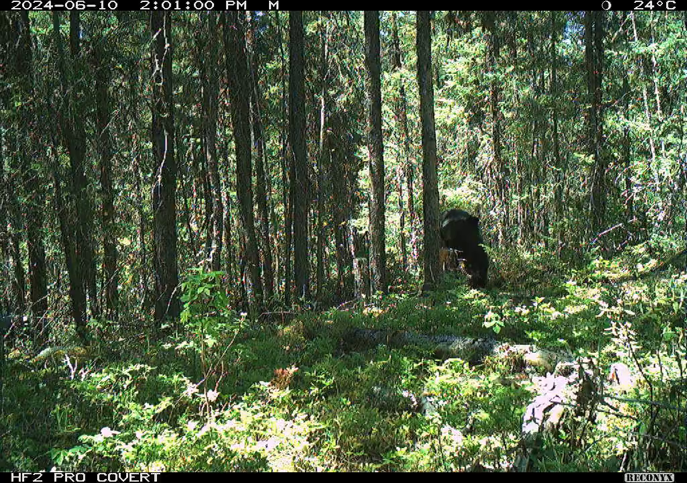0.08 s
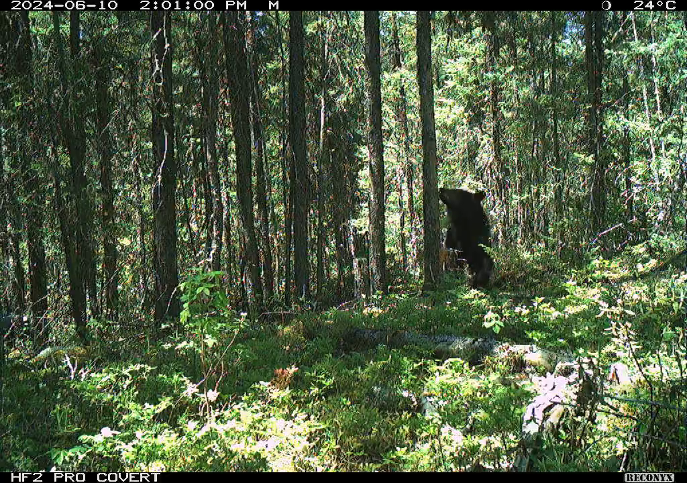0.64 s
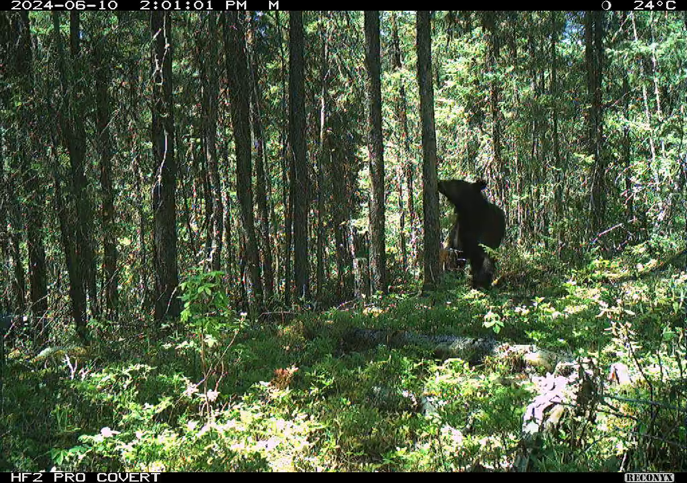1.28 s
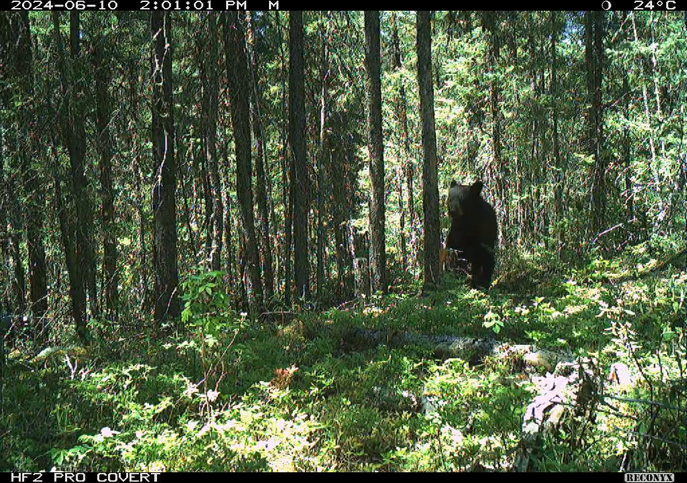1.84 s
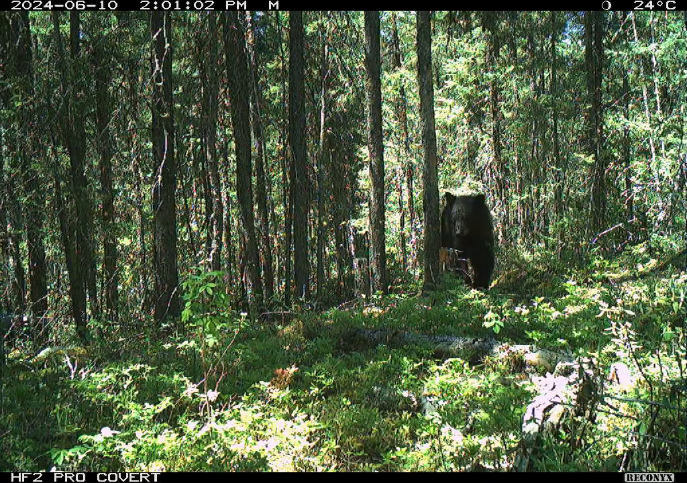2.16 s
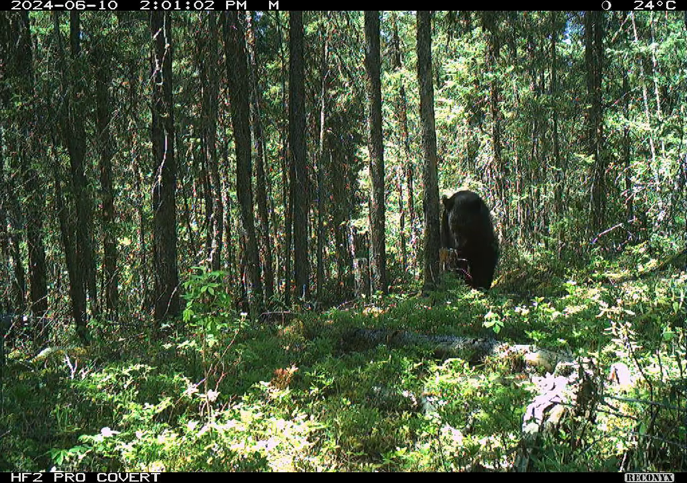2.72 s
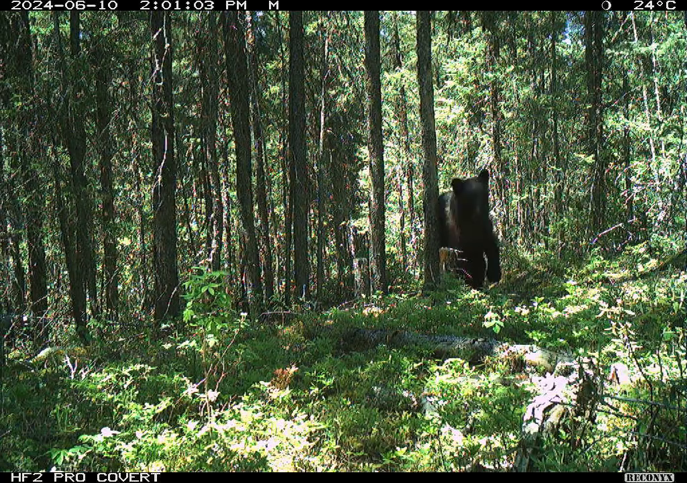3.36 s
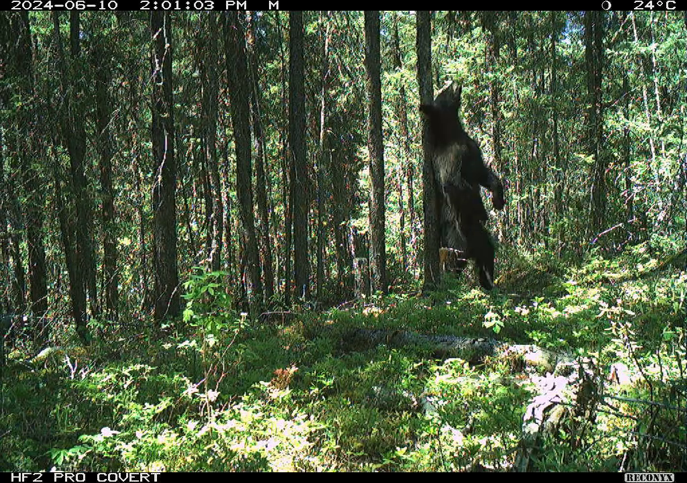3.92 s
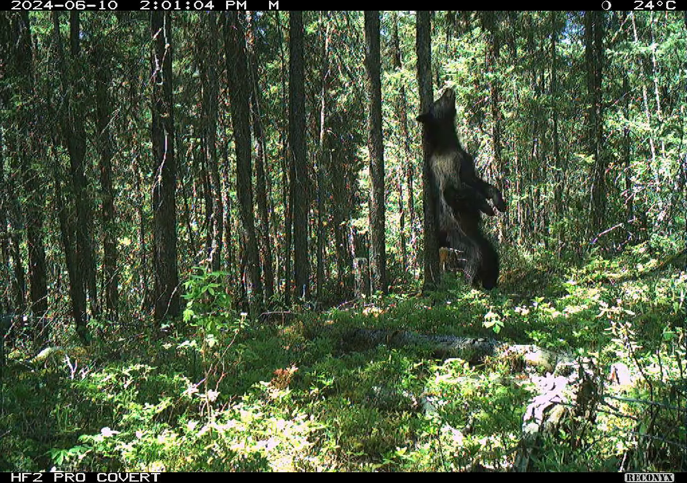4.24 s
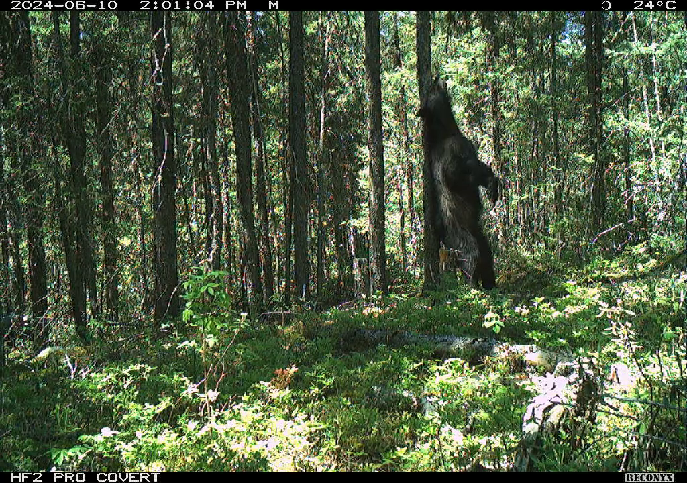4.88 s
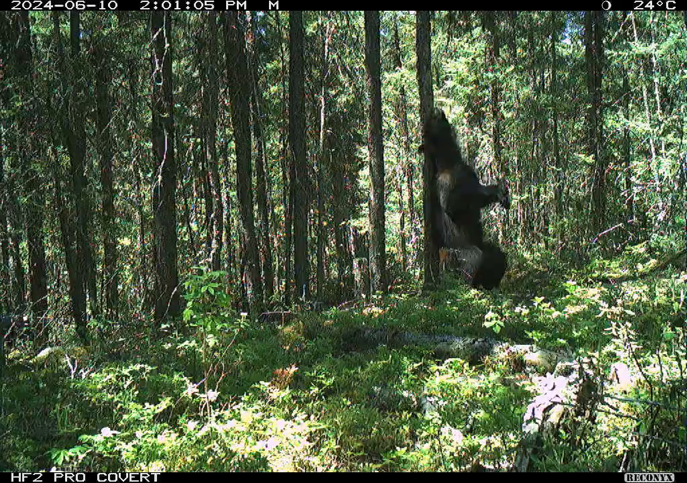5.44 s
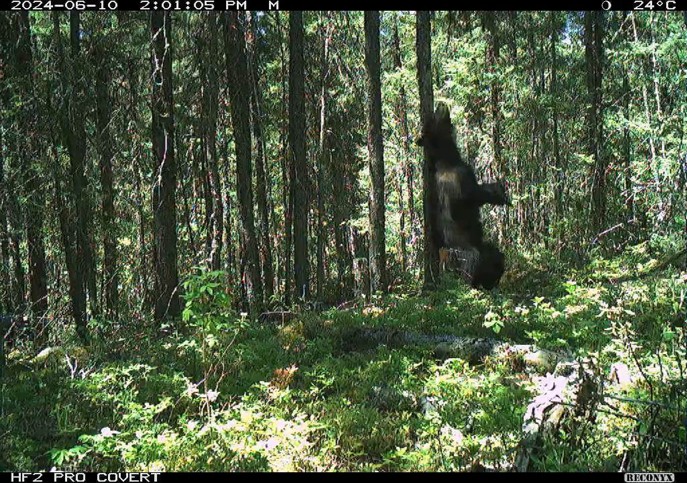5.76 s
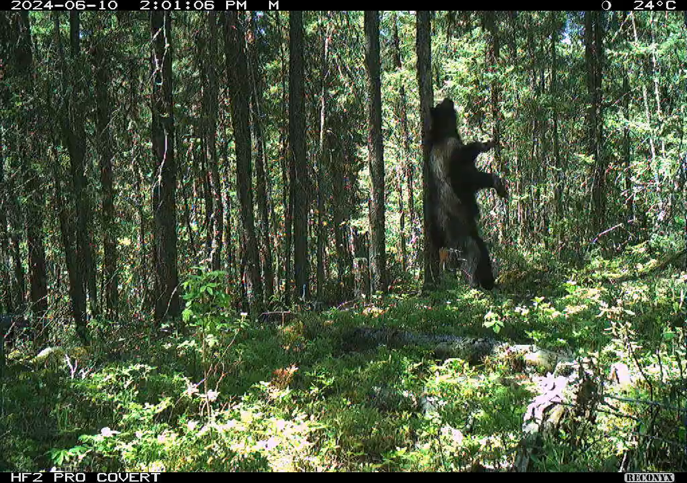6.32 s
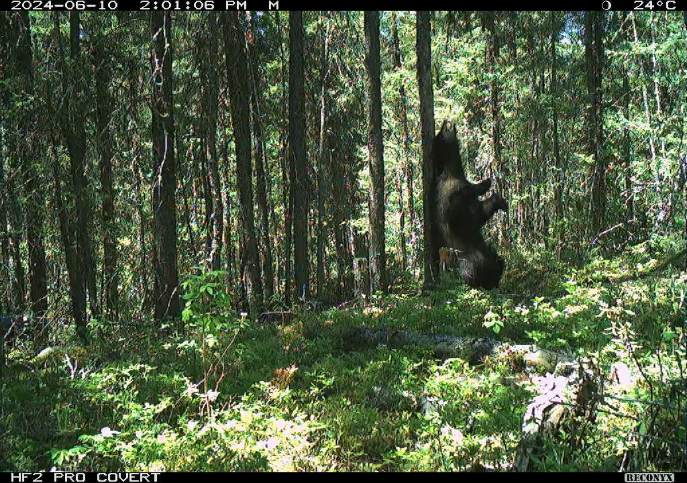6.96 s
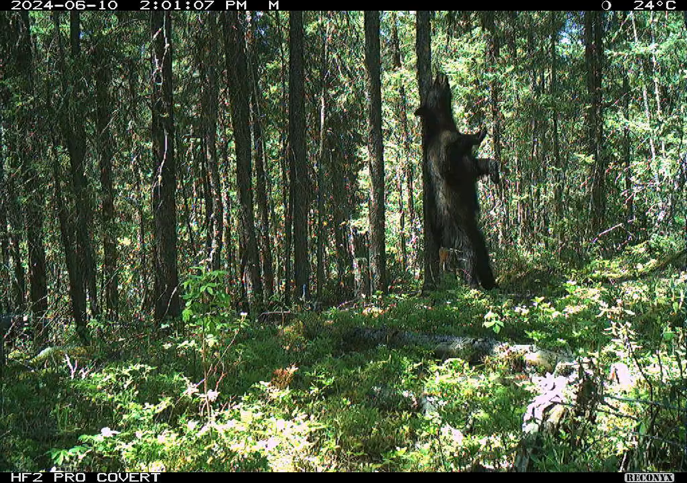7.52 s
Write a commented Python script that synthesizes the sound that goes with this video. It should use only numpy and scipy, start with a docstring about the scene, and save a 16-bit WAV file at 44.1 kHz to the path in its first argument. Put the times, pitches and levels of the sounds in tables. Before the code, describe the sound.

In a quiet forest, a soft pop opens onto constant microphone hiss and a few low bumps of wind. Small birds whistle, chirp and trill faintly in the first half. At a distance, a bear starts dragging its fur over tree bark, a dry, high rasp in repeated strokes. One dull footfall sounds midway, and crisp cracks of twigs and bark come more often toward the end.

```python
"""A trail camera in a forest wakes with a pop and fades up into its own hiss, wind rumbling at the port.
Small birds whistle and trill among the trunks. Some way from the microphone, a bear rears up
and rubs its back on a pine: fur drags over the bark in strokes, flakes and twigs snap,
and a hind paw thuds on the soil."""
import sys
import numpy as np
from scipy import signal
from scipy.fft import rfft, irfft
from scipy.io import wavfile

SR = 44100
rng = np.random.default_rng(int(sys.argv[2]) if len(sys.argv) > 2 else 0)


def put_to_file(sound):
    """Save the sound as 16-bit audio at rate SR, in the file named by the first command-line argument."""
    columns = np.atleast_2d(sound).T  # one column per channel
    safe = np.clip(columns, -1, 1)
    whole_steps = np.round(safe * 32767)
    wavfile.write(sys.argv[1], SR, whole_steps.astype(np.int16))


N = 340011
TIME = np.arange(N) / SR


# Strokes of the bear's back on the pine, some way off.
# Each row: start in seconds, length in seconds, relative level in dB, extra rasp in dB.
BACK_STROKES = [(2.717, 0.15, -74, 3), (2.88, 0.16, -72, 7), (3.24, 0.57, -69, 2), (3.691, 0.15, -59, -5),
                (3.758, 0.43, -69, 0.5), (4.07, 0.3, -64.5, -2.5), (4.402, 0.2, -61.5, 2),
                (4.674, 0.3, -62, -2), (5.06, 0.41, -58, -.5), (5.471, .14, -63, -2),
                (5.663, 0.32, -61.5, -4.5), (5.822, 0.27, -58, 1.5), (6.018, 0.33, -62, 1.5),
                (6.315, 0.37, -58, .5), (6.555, 0.33, -57, 0.5), (7.067, .2, -58.5, -1),
                (7.189, 0.22, -55, 1.5), (7.338, 0.15, -64, 0), (7.615, .09, -78, -3)]
# The colour of scraped bark. Each row: frequency in Hz, relative level in dB.
BARK_SPECTRUM = [(1060, -30), (1800, -19), (2150, -13.5), (2410, -17), (2730, -6.5), (2960, -15),
                 (3190, -10), (4070, -2.5), (4560, -0.5), (5070, -6), (5490, -12), (6440, -5), (7650, -7.5),
                 (8570, -20.5), (8800, -32), (11400, -62), (19400, -120)]

def rubbing(level_db=4, fur_db=-2, flakes_db=-5, flakes_per_s=600, catch_db=1, rasp_hz=5500):
    """Fur hisses over bark while flakes tick; the coat catches and slips, and leaning in adds rasp."""
    # once the bear is upright, its coat brushes the bark between strokes too
    hiss_power = rasp_power = (amp(-73) * ramp(start=3.15, length=0.25)) ** 2
    for start, length, db, rasp_db in BACK_STROKES:
        sliding_speed = arch(start, length)
        friction = amp(db) * sliding_speed ** 0.73
        hiss_power = hiss_power + friction ** 2
        rasp_power = rasp_power + (amp(rasp_db) * friction) ** 2
    flake_db = 3 * np.minimum(rng.exponential(1, N), 4.5)
    ticks = amp(flake_db) * rng.choice([-1, 1], N) * (rng.random(N) < flakes_per_s / SR)
    flakes = amp(flakes_db) * shaped(ticks, BARK_SPECTRUM)
    fur = amp(fur_db) * shaped(rng.standard_normal(N), BARK_SPECTRUM)
    scrape = fur + flakes
    rasp = signal.sosfiltfilt(signal.butter(6, rasp_hz, fs=SR, output="sos"), scrape)
    hiss = scrape - rasp  # the part above rasp_hz
    catching = amp(level_db + catch_db * drift(35))
    return catching * (np.sqrt(hiss_power) * hiss + np.sqrt(rasp_power) * rasp)


# Bark flakes and twigs breaking at the pine. Each row: start in seconds, rough peak in dB,
# ring frequency in Hz, ring strength in dB, crumbling time in seconds.
BREAKS = [(0.835, -53, 7000, 7, .0019), (1.578, -43, 6900, 0, .0026), (2.7745, -42, 5050, 12, 0.0025),
          (2.9065, -44, 4500, 8, 0.0023), (2.916, -32, 4200, 10, 0.001), (2.9185, -27.5, 4650, 16, 0.0019),
          (2.924, -39, 4500, 10, 0.0061), (3.7498, -41.5, 4880, 9, .0031), (4.044, -47, 7400, 3, .0015),
          (4.4428, -33.5, 3520, 8, 0.0012), (5.1705, -40, 4500, 6, .0023),
          (5.9113, -26, 3520, 10.5, 0.00071), (5.9815, -37.5, 4060, 12, .0009),
          (6.44, -34, 1580, 15.5, .001), (6.5043, -32, 3930, 8, 0.0011), (6.5078, -37, 7000, 10, .001),
          (6.5204, -37, 3580, 5, 0.00081), (6.5406, -33, 3800, 11, .0011), (6.816, -41, 4100, 0, 0.0011),
          (7.0971, -39, 4500, -2, 0.00061), (7.105, -33, 2400, 5, 0.0015),
          (7.2518, -32, 4400, 1.5, 0.00086), (7.2916, -39.5, 1690, 9, 0.0027),
          (7.3022, -40, 4200, -1, .0017)]
# The colour of a crack. Each row: frequency in Hz, relative level in dB.
CRACK_SPECTRUM = [(300, -27.5), (1200, -13.5), (2300, -10), (3200, -5.5), (4000, -0.5), (4900, -2.5),
                  (5700, -13), (6500, -7), (7600, -6.5), (8600, -21), (10000, -52)]

def snaps(crumble=0.55, scatter=0.022, scatter_s=0.0085, ring_q=2.3, crest=1.66):
    """Each break is a crack and tearing fibres that ring the wood, then scatter in the undergrowth."""
    out, size = np.zeros(N), 4096
    t, hz = np.arange(size) / SR, np.fft.rfftfreq(size, 1 / SR)
    for start, db, ring_hz, ring_db, crumble_s in BREAKS:
        decay = crumble * np.exp(-t / crumble_s) + scatter * np.exp(-t / scatter_s)
        force = rng.choice([-1, 1], size) * decay
        force[0] = 2  # the break itself
        ring = amp(ring_db / (1 + (2 * ring_q * (hz / ring_hz - 1)) ** 2))
        log_gain = np.log(colour(CRACK_SPECTRUM, hz) * ring)
        # minimum phase: nothing sounds before the break
        mirrored = np.r_[log_gain, log_gain[-2:0:-1]]
        wood = np.exp(np.conj(signal.hilbert(mirrored)))[:len(hz)]
        crack = irfft(rfft(force) * wood)
        rough_peak = crest * np.sqrt(np.sum(crack ** 2) / (crumble_s * SR))
        add(out, start, amp(db) * crack / rough_peak)
    return out


# One hind paw landing at the foot of the tree.
# Each row: start in seconds, level in dB, frequency in Hz, seconds to fade by 60 dB.
THUD_MODES = [(3.905, -42, 107.3, 0.12), (3.908, -58, 154, 0.17)]

def paw():
    """The forest floor gives a short, dull thud under the bear's weight."""
    out, t = np.zeros(N), np.arange(SR // 3) / SR
    for start, db, hz, t60 in THUD_MODES:
        add(out, start, amp(db) * 1e-3 ** (t / t60) * np.sin(2 * np.pi * hz * t))
    return out


# The triller's two syllables. Each row: seconds into the syllable, pitch in Hz, relative level in dB.
ARCHED_SYLLABLE = [(0, 4000, 1), (.008, 4300, 6), (.017, 4850, 3), (.023, 6200, -15), (.033, 7100, -9),
                   (.046, 6150, -2), (.054, 5980, -6)]
CHIP_SYLLABLE = [(0, 5850, -5), (.006, 5800, -3), (.008, 5550, -7), (.011, 5000, 0), (.015, 4550, 3.5),
                 (.022, 3950, -1)]
# Its loose notes ahead of the trill. Each row: start in seconds, relative level in dB.
OPENING_CHIPS = [(2.045, -62), (2.29, -59)]
ARCHED_NOTES = [(2.483, -57), (2.720, -59), (2.947, -56.5)]
# Its echoes off the nearest trunks. Each row: delay in seconds, level in dB against the direct sound.
NEAR_ECHOES = [(.015, -4), (.026, -12)]

def triller(level_db=-3, swell_db_per_s=8):
    """A bird among the trees gives two chips, three arched notes, then a trill that swells and holds."""
    times = beats(start=3.106, every=0.1262, count=11)
    swell_db = np.minimum(-56.5 + swell_db_per_s * (times - times[0]), -50.5)
    chips = OPENING_CHIPS + list(zip(times, swell_db))
    direct = amp(level_db) * (song(ARCHED_SYLLABLE, ARCHED_NOTES) + song(CHIP_SYLLABLE, chips))
    heard = direct.copy()
    for delay, db in NEAR_ECHOES:
        add(heard, delay, amp(db) * direct)
    return forest(heard, wet_db=-3, t60=0.31)


# The whistler's note. Each row: seconds into the note, pitch in Hz, relative level in dB.
WHISTLE_SYLLABLE = [(0, 3300, -9), (.014, 3580, -2), (.03, 3760, 0), (.06, 3775, -1), (.075, 3760, -8)]

def whistler(level_db=-59):
    """A second bird repeats one rising note evenly, and it lingers between the trunks."""
    notes = [(start, level_db) for start in beats(start=0.413, every=0.308, count=5)]
    return forest(song(WHISTLE_SYLLABLE, notes), wet_db=-5, t60=0.61)


def song(syllable, notes, waver=0.006, waver_hz=70):
    """A bird repeats one gliding, nearly pure syllable, never at quite the same pitch."""
    at, pitch_hz, level_db = np.transpose(syllable)
    t, out = np.arange(0, at[-1], 1 / SR), np.zeros(N)
    swell = amp(np.interp(t, at, level_db)) * signal.windows.tukey(len(t), 0.15)
    for start, db in notes:
        wobble = 1 + waver * (rng.standard_normal() + np.sin(2 * np.pi * (waver_hz * t + rng.random())))
        hz = wobble * np.interp(t, at, pitch_hz)
        add(out, start, amp(db) * swell * np.sin(2 * np.pi * np.cumsum(hz) / SR))
    return out


# Wind right on the microphone. Each row: frequency in Hz, relative level in dB.
RUMBLE_SPECTRUM = [(5.9, -29), (10, 4.5), (18, 2), (34, -1.5), (200, -24.5), (260, -47.5), (440, -120)]
# Gusts bumping the port. Each row: start in seconds, length in seconds, level in dB.
PORT_GUSTS = [(0.752, 0.12, -41.5), (1.004, 0.15, -36), (1.12, 0.13, -40.5)]

def wind(rumble_db=-58.5, breeze_db=6, buffet_hz=52, hollow_db=-72, hollow_hz=235):
    """Air rumbles at the microphone port; an early breeze buffets it and blows a faint hollow note."""
    breeze = np.exp(-((TIME - 0.72) / 0.4) ** 2)  # one swell of air, peaking at 0.72 s
    rumble = amp(rumble_db + breeze_db * breeze) * shaped(rng.standard_normal(N), RUMBLE_SPECTRUM)
    buffets = drift(buffet_hz) * sum(amp(db) * arch(start, length) for start, length, db in PORT_GUSTS)
    phase = 2 * np.pi * hollow_hz * TIME
    hollow = drift(20) * np.cos(phase) + drift(20) * np.sin(phase)  # noise about 40 Hz wide
    return rumble + buffets + amp(hollow_db) * breeze * hollow


# The camera's own noise floor. Each row: frequency in Hz, relative level in dB.
HISS_SPECTRUM = [(59, -31), (100, -5), (186, -7), (314, -7.5), (510, -8), (1060, -9), (1660, -12),
                 (2560, -14.5), (2810, -9), (3140, -8.5), (3720, -10), (4480, -7), (6400, -22.5),
                 (7580, -23.5), (8800, -42.5), (11400, -76), (19400, -120)]

def camera_hiss(level_db=-59, waver_db=0.47):
    """The camera hisses steadily under everything, wavering a little."""
    return amp(level_db + waver_db * drift(8.7)) * shaped(rng.standard_normal(N), HISS_SPECTRUM)


def forest(x, wet_db, t60):
    """On the way to the microphone, many trunks scatter the sound into a short, thin tail."""
    t = np.arange(SR) / SR
    echoes = rng.standard_normal(SR) * (rng.random(SR) < 2000 / SR)  # about 2000 a second
    tail = echoes * 0.0009 ** (t / t60) * (t > 0.004)
    return x + amp(wet_db) * signal.fftconvolve(x, tail / np.linalg.norm(tail))[:N]


# A faint distant hum near 310 Hz; the other rows are resonances around the microphone.
# Each row: centre in Hz, width in Hz, gain in dB.
HUM_AND_RESONANCES = [(309.4, 24, 4), (2160, 120, 3.5), (2310, 250, 1.5), (2765, 220, 2), (3154, 230, -3.5),
                      (4000, 150, 0.5), (5040, 520, 2.5), (5570, 390, -0.5), (7580, 170, 2)]

def colour(spectrum, hz):
    """Gain of a spectrum, with a narrow peak for the hum and the resonances around the microphone."""
    points_hz, points_db = np.transpose(spectrum)
    source_db = np.interp(np.log(hz + 1), np.log(points_hz + 1), points_db)
    peaks_db = sum(db / (1 + (2 * (hz - centre) / width) ** 2) for centre, width, db in HUM_AND_RESONANCES)
    return amp(source_db + peaks_db)


def shaped(x, spectrum):
    """Gives x that colour, at rms 1."""
    return unit(irfft(rfft(x) * colour(spectrum, np.fft.rfftfreq(N, 1 / SR)), N))


def drift(rate):
    """A random wander of rms 1, up to about rate changes a second."""
    hz = np.fft.rfftfreq(N, 1 / SR)
    return unit(irfft(rfft(rng.standard_normal(N)) * np.exp(-(hz / rate) ** 2), N))


def amp(db):
    """Decibels to gain."""
    return 10 ** (np.asarray(db) / 20)


def unit(x):
    """Scales to rms 1."""
    return x / np.sqrt(np.mean(x ** 2) + 1e-20)


def add(mix, start, sound):
    """Mixes a sound in at start seconds."""
    part = mix[max(round(start * SR), 0):][:len(sound)]
    part += sound[:len(part)]


def arch(start, length):
    """A half sine that rises from rest and returns to it."""
    return np.sin(np.pi * ramp(start, length)).clip(0)


def ramp(start, length):
    """Rises evenly from 0 to 1, then holds."""
    return np.clip((TIME - start) / length, 0, 1)


def beats(start, every, count):
    """Evenly spaced times in seconds."""
    return start + every * np.arange(count)


def scene():
    """The bear, the birds and the air, heard in mono by one small microphone."""
    bear = forest(rubbing() + snaps(), wet_db=-12, t60=0.13) + paw()
    return (bear + triller() + whistler() + wind() + camera_hiss())[None]


# Steps of the microphone bias as the camera wakes.
# Each row: start in seconds, step size in dB, rise time in seconds, settling time in seconds.
BIAS_POPS = [(0.125, -33, 0.038, 0.16), (0.381, -47.5, 0.000017, 0.097)]

def record(dry, wake_steps_db=(-62, -23.5, -17.5), cutoff_hz=8850):
    """The camera's gain steps up with each bias pop, then ramps to full; the top treble is cut off."""
    pops_so_far = sum(TIME >= pop[0] for pop in BIAS_POPS)
    step_gain = amp(wake_steps_db)[pops_so_far]
    out = dry[0] * (step_gain + (1 - step_gain) * ramp(start=0.63, length=0.36))
    for start, db, rise_s, settle_s in BIAS_POPS:
        add(out, start, amp(db) * (np.exp(-TIME / rise_s) - np.exp(-TIME / settle_s)))
    lowpass = signal.firwin(255, cutoff_hz, window=("kaiser", 8), fs=SR)
    return signal.oaconvolve(out, lowpass, "same")[None]


dry = scene()
out = record(dry)
put_to_file(out)
```